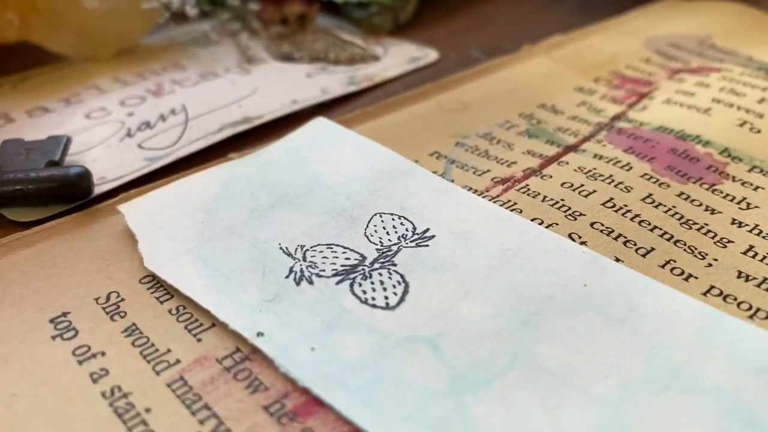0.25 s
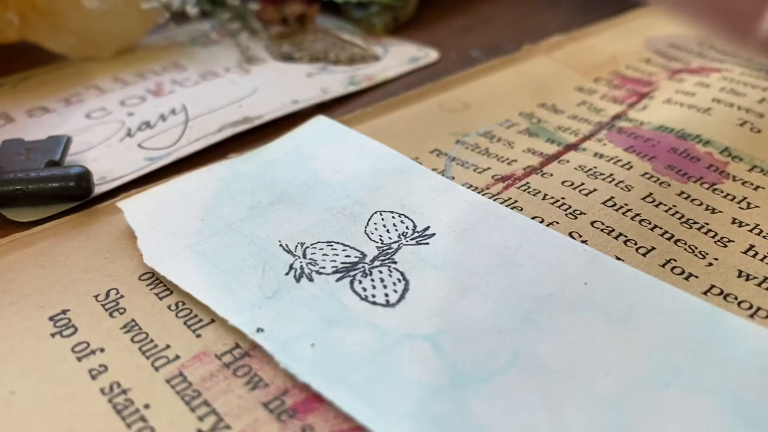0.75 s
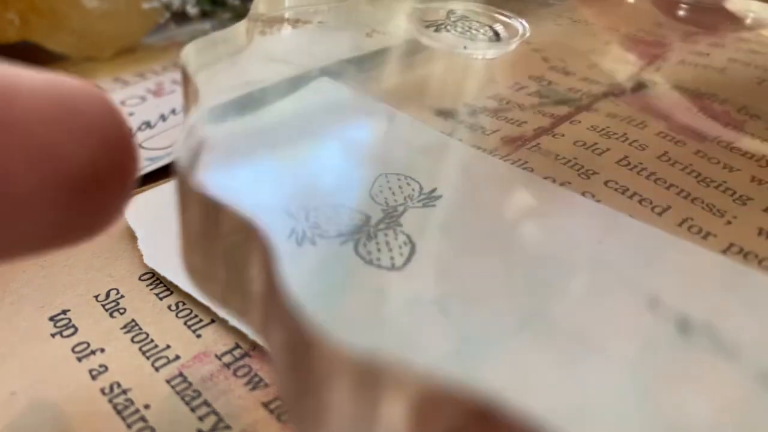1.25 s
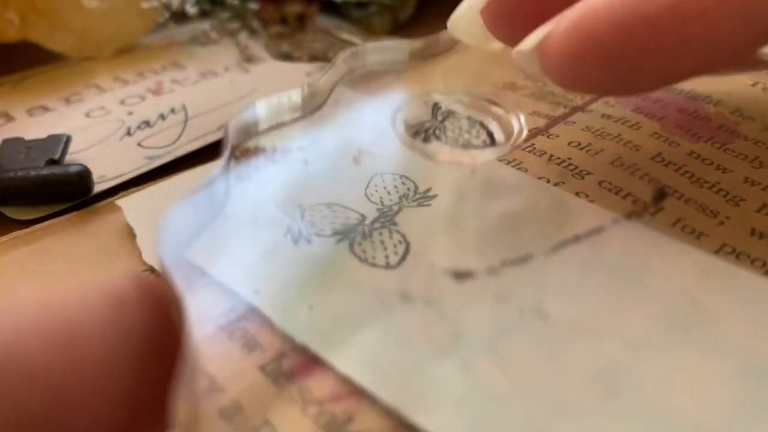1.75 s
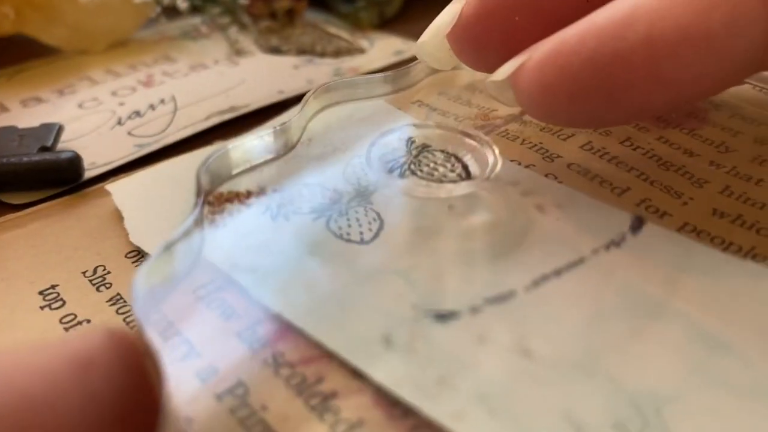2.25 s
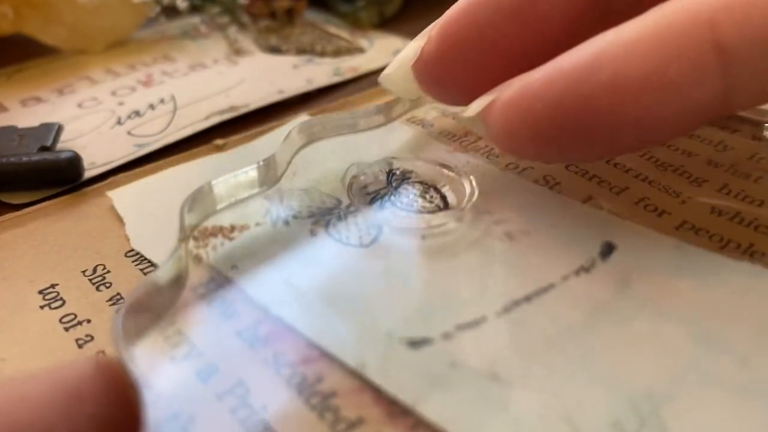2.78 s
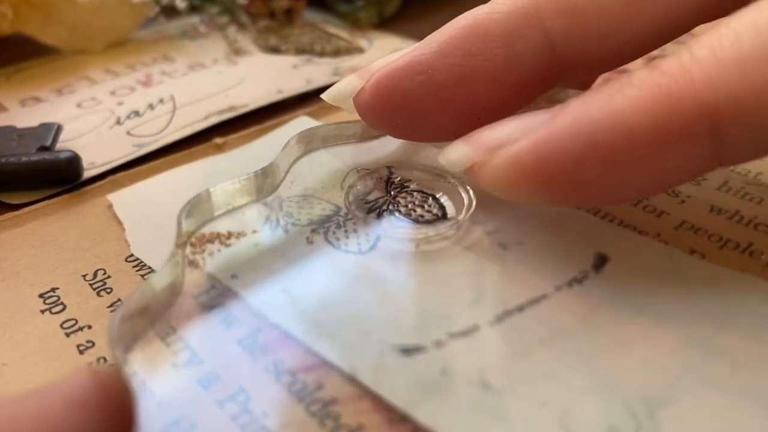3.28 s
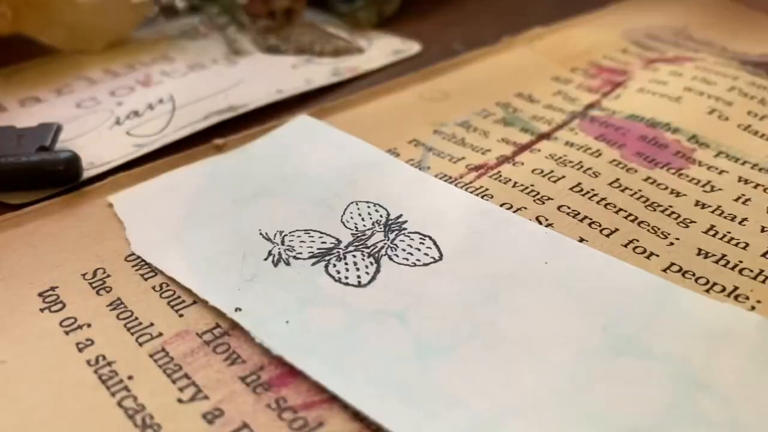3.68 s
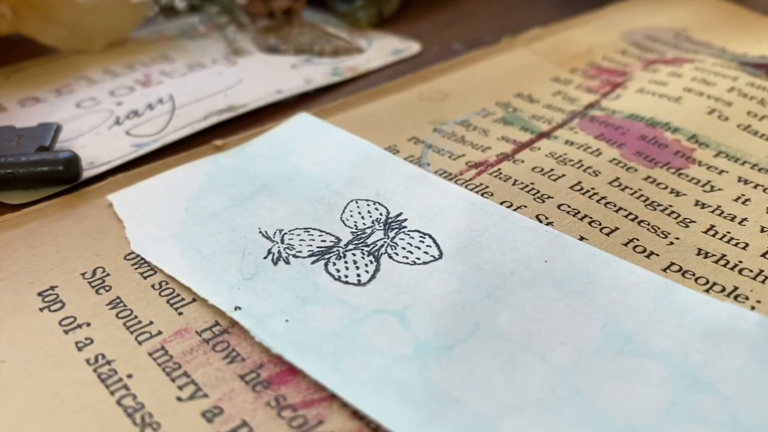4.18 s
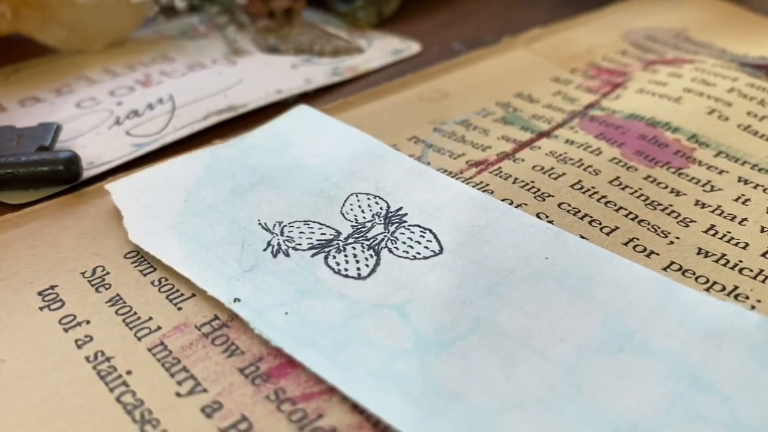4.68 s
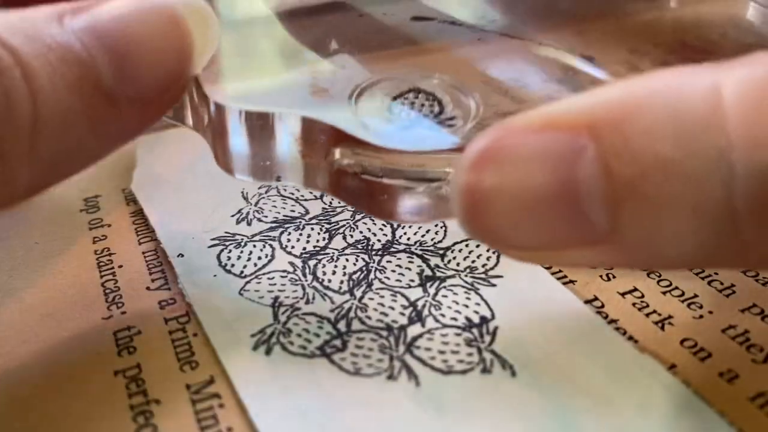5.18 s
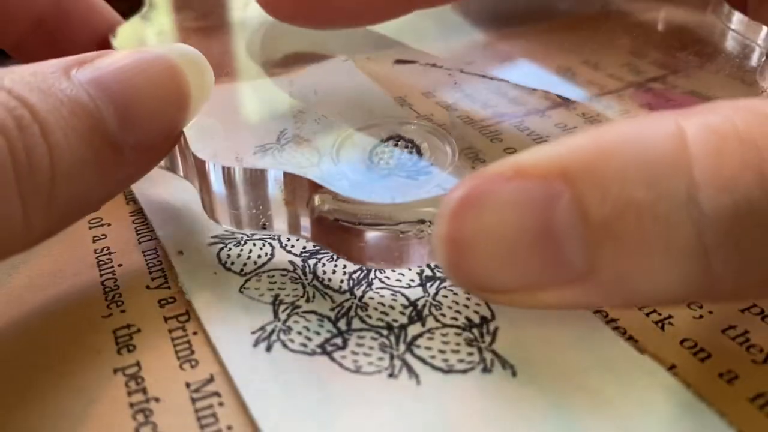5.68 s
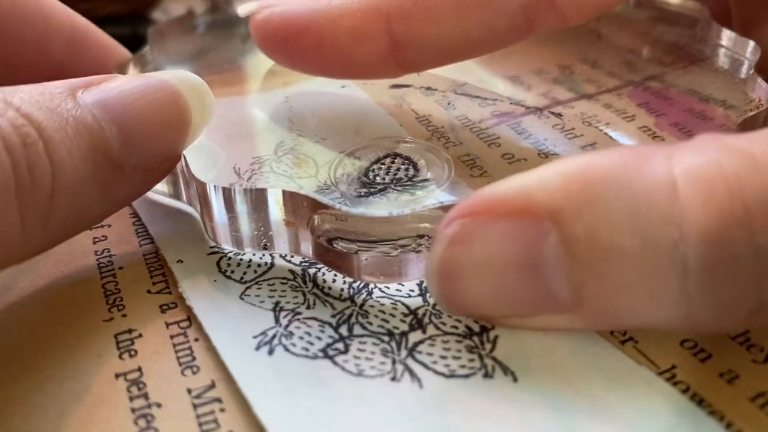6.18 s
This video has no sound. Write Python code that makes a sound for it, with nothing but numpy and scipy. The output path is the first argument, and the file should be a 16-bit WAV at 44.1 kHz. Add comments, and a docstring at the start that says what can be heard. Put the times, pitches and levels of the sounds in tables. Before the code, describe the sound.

Close clicks and knocks of a plastic stamp block on a wooden table, with fingers brushing paper, ending in a louder clatter.

```python
"""Hands work a plastic stamp block on paper on a wooden table, close to a small pair of microphones.
Over a low rumble the table thuds, the block clicks and a far bang rings through the house; at 0.4 s
the sound stops short and fades in again. Skin brushes the paper, another bang rings, and around 2 s
the block drags by stick and slip. Knocks at 3.6 s are followed by two more bangs. At 4.75 s the sound
stops and fades in once more, and near 6 s come the loudest, most reverberant blows."""
import sys
import numpy as np
from scipy import signal
from scipy.fft import rfft, irfft
from scipy.io import wavfile

SR = 44100
rng = np.random.default_rng(int(sys.argv[2]) if len(sys.argv) > 2 else 0)


def transcribe(u):
    """Save the signal u as a 16-bit wav file named by the first command-line argument.

    u: samples, shape (n,) or (channels, n), limited to [-1, 1]; the rate is SR.
    q: integer samples, one column per channel.
    """
    v = np.clip(np.atleast_2d(u).T, -1, 1)
    q = np.round(v * 32767).astype(np.int16)
    wavfile.write(sys.argv[1], SR, q)


N = 284004

# Left-right likeness of the background and reverberation, wide in the middle, narrow in bass and treble:
# (frequency [Hz], correlation [0-1])
DIFFUSE = [(60, 1), (130, 0.83), (290, 0.98), (640, 0.041), (1400, 0.18), (3100, 0.3), (5500, 0.19),
           (7000, 0.86), (16000, .99)]


def gain_of(db):
    """Amplitude ratio of a level: tenfold for every 20 dB."""
    return 10 ** (np.asarray(db) / 20)


def at_frequency(points, hz):
    """Interpolation of a table along logarithmic frequency."""
    f, value = np.transpose(points)
    return np.interp(np.log(hz + 1), np.log(f + 1), value)


def over_time(rows, column=1):
    """Linear interpolation of one column over the whole duration."""
    rows = np.array(rows)
    return np.interp(np.arange(N) / SR, rows[:, 0], rows[:, column])


def add(mix, start_s, sound):
    """Superposition: a sound sums into the mix from its start time."""
    part = mix[:, round(start_s * SR):][:, :sound.shape[1]]
    part += sound[:, :part.shape[1]]


def noise(colour, correlation, grain_db=0., grains_per_s=0., hold=0.69, size=N):
    """Partly coherent stereo noise of unit rms; random grains modulate it, decaying by `hold` a sample."""
    grain_gain = gain_of(grain_db * np.minimum(rng.exponential(1, size), 4))
    grains = grain_gain * (rng.random(size) < grains_per_s / SR)
    grit = 1 + signal.lfilter([1], [1, -hold], grains)
    left, independent = rfft(rng.standard_normal((2, size)) * grit)
    hz = np.fft.rfftfreq(size, 1 / SR)
    likeness = np.clip(at_frequency(correlation, hz), 0, 1)
    right = likeness * left + np.sqrt(1 - likeness ** 2) * independent
    pair = irfft(np.array([left, right]) * gain_of(at_frequency(colour, hz)), size)
    return pair / np.sqrt(np.mean(pair ** 2) + 1e-20)


def reverberation(source, t60, colour, size):
    """Convolution with a noise tail whose bands decay exponentially, each at its own rate."""
    hz, t, bands = signal.stft(noise(colour, DIFFUSE, size=size), SR, nperseg=256)
    decay = gain_of(-60 * t / at_frequency(t60, hz)[:, None])
    tail = signal.istft(bands * decay, SR, nperseg=256)[1]
    return signal.fftconvolve(source, tail / np.linalg.norm(tail[0]), axes=1)[:, :N]


def strike(modes, db, hz, contact_ms, octaves):
    """Modal response: a blow rings the modes near its favoured pitch; a long contact makes them swell."""
    t = np.arange(8000) / SR
    f, mode_db, t60 = np.transpose(modes)[:, :, None]
    excitation_db = -6 * (np.log2(f / hz) / octaves) ** 2
    envelopes = gain_of(mode_db + excitation_db - 60 * t / t60)
    ring = (envelopes * np.sin(2 * np.pi * (f * t + rng.random(f.shape)))).sum(0)
    ring *= 1 - np.exp(-(1000 * t / contact_ms) ** 2)
    return gain_of(db) * ring[None] / abs(ring).max()


def friction_power(start_s, length_s, db, rise, sag, fall):
    """Power of a sliding contact: it rises, sags while held and falls away, at rates in dB/s."""
    t = np.arange(N) / SR - start_s
    held_db = db + rise * np.minimum(t, 0) - sag * np.clip(t, 0, length_s)
    return gain_of(held_db - fall * np.maximum(t - length_s, 0)) ** 2


def rumble():
    """Slow amplitude modulation: noise strongest near 50 Hz swells and ebbs."""
    # Envelope of the rumble: (time [s], level [dB])
    swell = [(0, -49), (.4, -49), (.6, -39.5), (1.2, -48.5), (1.6, -41.5), (2.4, -41.5), (2.7, -45),
             (3.9, -41), (4.2, -49), (6.44, -39.5)]
    # Its spectrum: (frequency [Hz], relative level [dB])
    colour = [(20, -43.5), (40, -30.5), (50, 3), (57, -3.5), (66, -3.5), (95, -8.5), (130, -22),
              (200, -22.5), (400, -71.5)]
    return gain_of(over_time(swell)) * noise(colour, DIFFUSE)


def room_air():
    """Stationary noise: the faint hush of the room."""
    # Spectrum of the hush: (frequency [Hz], relative level [dB])
    colour = [(150, -5.5), (250, 3), (500, -2), (1000, -7.5), (1500, -15.5), (2500, -17.5), (5000, -20.5),
              (8000, -26.5), (13000, -29), (14500, -60)]
    return gain_of(-64.5) * noise(colour, DIFFUSE)


def table_thuds():
    """Damped modal vibration: the struck wooden top rings until the pressing hand stops it."""
    # Blows: (time [s], level before hand damping [dB], favoured pitch [Hz], contact time [ms])
    thuds = [(.004, -27, 392, 12), (0.058, -33, 186, 1.9), (0.449, -19.5, 400, 52),
             (0.484, -28.5, 232, 2.3), (0.511, -33.5, 450, 2.2), (0.517, -21.5, 383, 8.7),
             (1.521, -39, 430, 17), (1.64, -21.5, 433, 3.5), (1.647, -33.5, 130, 8.9),
             (2.21, -27, 223, 3.1), (2.245, -29, 237, 1.3), (2.496, -38, 584, 3.4), (2.79, -33.5, 298, 0.7),
             (3.479, -37.5, 222, 3.6), (3.5, -29, 490, 15), (3.567, -22.5, 550, 0.7),
             (3.577, -25.5, 547, 14), (3.593, -15.5, 520, 18), (3.601, -16, 473, 14),
             (4.648, -30.5, 477, 5.9), (4.653, -17, 311, 9.7), (4.698, -33.5, 256, 5.2),
             (4.729, -38.5, 514, 1.3), (5.934, -14.5, 800, 0.86), (5.938, -9, 680, 11.3),
             (5.94, -21.5, 137, 2.7), (6.001, -15, 1400, 5.4), (6.031, -9.5, 707, 30),
             (6.042, -31, 120, 5.6), (6.045, -15, 870, 3), (6.074, -25.5, 705, 2)]
    # Modes of the top: (frequency [Hz], relative level [dB], t60 [s])
    wood_modes = [(129, -10, 0.32), (157, 13, 0.031), (275, 3.5, 0.033), (351, -1, 0.032),
                  (471.4, 9, 0.026), (636, 6.5, 0.027), (852, -0.5, 0.025), (986, -7, 0.16),
                  (1190, -7, 0.24), (1382, 5, 0.093), (1884, 12, 0.022)]
    damped_cycles = 9.3  # the hand's damping reaches 1/e after this many cycles
    out, t = np.zeros((1, N)), np.arange(8000) / SR
    for s, db, hz, contact_ms in thuds:
        damping = np.exp(-(t * hz / damped_cycles) ** 2)
        add(out, s, damping * strike(wood_modes, db, hz, contact_ms, octaves=0.4))
    return out


def block_clicks():
    """Impact transients: nails and edges give a dry crack and a fainter modal ring of the plastic."""
    # Cracks: (time [s], peak level [dB], favoured pitch [Hz], t60 [ms], relative broadband floor [dB])
    clicks = [(.0044, -33, 7600, 9, 2), (0.0548, -46.5, 5040, 25, -2), (.66, -42.5, 2200, 66, -23.5),
              (0.977, -49.5, 3470, 41, 0), (1.2154, -51, 14500, 12, -12), (1.3235, -33.5, 11600, 39, -18.5),
              (1.6383, -14.5, 1440, 9.6, -43.5), (1.685, -34, 1180, 21, -49), (1.8417, -33, 1430, 17, -53),
              (2.177, -47, 3000, 33, -5), (2.725, -54, 8000, 8, -12), (2.772, -42, 7600, 5.4, -21),
              (2.853, -45, 4330, 13, -8), (3.057, -36, 1700, 60, 1), (3.438, -32, 5700, 24, -10),
              (3.4982, -28, 1290, 23, -39), (3.528, -44.5, 8000, 6, 3), (3.566, -42, 1630, 72, -35),
              (3.581, -40, 1740, 6.6, -23), (3.596, -38, 1630, 56, -37), (3.605, -46, 4600, 6.1, -13),
              (3.711, -47, 11900, 8.9, -22), (5.1789, -42, 6050, 9.1, -9), (5.881, -47.5, 10700, 16, -7),
              (5.9335, -17, 1580, 4.7, -22), (5.9337, -16.5, 3800, 13, -12), (5.971, -18, 1940, 27, -17),
              (6.001, -15, 6030, 16, -10.5), (6.0446, -9, 6850, 18, -8.5), (6.059, -20.5, 5880, 36, -14),
              (6.172, -51, 12000, 9.5, -16), (6.182, -47, 12000, 11, -28), (6.403, -39.5, 1120, 30, -44)]
    # Modes of the block: (frequency [Hz], relative level [dB], t60 [s])
    plastic_modes = [(2040, 10, 0.018), (3313, 2, 0.028), (4630, 0.5, 0.026), (6560, -1, 0.011),
                     (7370, 0, 0.0045)]
    ring_db, onset_cycles = -10, 0.83  # onset counted in cycles: low knocks start softer
    out, t = np.zeros((1, N)), np.arange(2048) / SR
    f = np.fft.rfftfreq(len(t), 1 / SR) + 1
    for s, db, hz, t60_ms, floor_db in clicks:
        band_db = np.maximum(-6 * (np.log2(f / hz) / 0.42) ** 2, floor_db)
        bass_loss_db = 6 * np.maximum(np.log2(900 / f), 0)
        crack = irfft(rfft(rng.standard_normal(len(t))) * gain_of(band_db - bass_loss_db))
        onset = 1 - np.exp(-(t * hz / onset_cycles) ** 2)
        crack *= onset * gain_of(-60000 * t / t60_ms)
        add(out, s, gain_of(db) * crack[None] / abs(crack).max())
        add(out, s, strike(plastic_modes, db + ring_db, hz, contact_ms=0.45, octaves=0.38))
    return out


def place_blows(blows):
    """Direct and reverberant sound: the blows lean to the left, and the last ones are more reverberant."""
    # Balance and room level: (time [s], left-right level difference [dB], level sent to the room [dB])
    placement = [(0, 3.5, -9.5), (1.6, 3.5, -17), (3.5, 3, -20), (4.6, 0.5, -13.5), (5.9, 8, -5),
                 (6.44, 8, -10)]
    # Decay of the near room: (frequency [Hz], t60 [s])
    room_t60 = [(200, 0.13), (600, 0.22), (2000, 0.24), (6000, 0.12)]
    # Spectrum of its reflections: (frequency [Hz], relative level [dB])
    room_colour = [(400, -2.5), (2500, -2)]
    body = signal.filtfilt(*signal.butter(4, 7500, fs=SR), blows)
    treble = blows - body  # equally loud on both sides
    direct = treble + body * gain_of(over_time(placement) * np.array([[.5], [-.5]]))
    radiated = blows * gain_of(over_time(placement, column=2))
    return direct + reverberation(radiated, room_t60, room_colour, size=14000)


def skin_brush():
    """Friction noise: skin on paper makes a fine gritty hiss; firmer contact adds the lower bands."""
    # Strokes: (time of full contact [s], length [s], level [dB], firmness [0-1])
    strokes = [(0.024, 0.046, -70, 1), (0.702, .11, -51, 0.14), (0.827, 0.14, -62.5, .75),
               (0.927, 0.1, -54.5, 0.02), (1.042, .06, -56, 0.04), (1.095, 0.099, -50.5, 0.2),
               (1.316, .06, -62, 0.3), (1.515, 0.069, -55, 0.6), (1.622, 0.023, -60.5, 0.7),
               (1.749, 0.053, -52.5, 1), (1.872, .14, -64, 0.4), (2.06, 0.065, -56, .4),
               (2.19, .05, -76, 0.4), (2.755, 0.12, -61, 0.1), (2.936, 0.19, -58.5, 1),
               (3.044, 0.021, -50, 1), (3.09, 0.085, -68.5, 1), (3.416, 0.024, -51.5, 0.7),
               (3.467, .12, -59.5, 1), (4.765, 0.047, -53, 0.02), (5.061, 0.1, -42.5, 0.02),
               (5.228, 0.023, -54.5, 0), (5.78, 0.024, -55, 0), (5.83, 0.25, -63.5, 0.3),
               (6.08, 0.11, -55, 0.8), (6.316, .04, -60, .5), (6.361, 0.03, -36, 0.15),
               (6.41, 0.024, -60, 1)]
    # Spectrum of a light touch: (frequency [Hz], relative level [dB])
    light_colour = [(800, -28), (2000, -21.5), (4000, -12), (7000, -3.5), (9000, -1), (11000, -2.5),
                    (13000, -11.5), (15500, 0)]
    # Spectrum of a firm touch: (frequency [Hz], relative level [dB])
    firm_colour = [(800, 3), (1400, 4.5), (2000, 5.5), (2800, -6), (4000, -6.5), (7000, 1.5), (9000, 5),
                   (11000, -2), (13000, 6), (15500, -7)]
    correlation = [(1000, .5), (5000, .7), (7000, .995)]  # (frequency [Hz], correlation [0-1])
    bright = noise(light_colour, correlation, grain_db=6, grains_per_s=220)
    dull = noise(firm_colour, correlation, grain_db=6, grains_per_s=220)
    light_power, firm_power = np.zeros((2, N))
    for s, length, db, firmness in strokes:
        power = friction_power(s, length, db, rise=889, sag=74.5, fall=892.5)
        light_power += (1 - firmness) * power
        firm_power += firmness * power
    return np.sqrt(light_power) * bright + np.sqrt(firm_power) * dull


def far_bangs():
    """Beyond the critical distance: short bursts are heard mostly as the reverberation of the house."""
    # Bangs: (time [s], level [dB], treble loss [dB/octave])
    bangs = [(0.174, -28.5, 1), (1.096, -28.5, 2.5), (3.676, -34.5, 4.5), (3.742, -28.5, 1)]
    # Spectrum before that loss: (frequency [Hz], relative level [dB])
    bang_colour = [(150, -12), (370, -5.5), (700, -9.5), (1000, 1.5), (1500, -11.5), (2200, -6),
                   (4000, -13), (8000, -25.5), (15500, -38)]
    # Decay of the house: (frequency [Hz], t60 [s])
    house_t60 = [(200, 0.23), (500, 0.34), (1000, 0.27), (2000, 0.23), (4000, 0.25), (8000, 0.2)]
    burst_t60_s, direct_db = 0.23, -12
    bursts = np.zeros((1, N))
    decay = gain_of(-60 * np.arange(2500) / SR / burst_t60_s)
    for s, db, loss in bangs:
        tilted = [(hz, level_db - loss * np.log2(hz / 1000)) for hz, level_db in bang_colour]
        add(bursts, s, gain_of(db) * decay * noise(tilted, DIFFUSE, size=len(decay))[:1])
    ring = reverberation(bursts, house_t60, colour=[(100, 0.015), (9000, 0)], size=24000)
    return ring + gain_of(direct_db) * bursts


def block_drag():
    """Stick-slip friction: the shoved block shakes the table in small lumps."""
    # Shoves: (time of full contact [s], length [s], level [dB])
    shoves = [(0.676, 0.071, -56.5), (1.52, 0.14, -51), (1.696, 0.09, -35.5), (1.78, 0.029, -28.5),
              (1.843, 0.027, -41), (1.895, 0.017, -35), (1.974, 0.041, -36.5), (2.063, 0.064, -29.5),
              (2.164, 0.16, -47), (5.873, 0.021, -50), (5.954, 0.02, -27.5), (6.026, 0.043, -31.5)]
    # Spectrum of the shaken table: (frequency [Hz], relative level [dB])
    colour = [(50, -48), (90, 0.5), (150, 2), (280, -6.5), (550, -5), (800, -11), (1000, -19), (1500, -26),
              (2000, -26), (2900, -47), (6000, -50)]
    correlation = [(100, .97), (1000, .7), (4000, .6)]  # (frequency [Hz], correlation [0-1])
    power = sum(friction_power(*shove, rise=598.5, sag=52.5, fall=347) for shove in shoves)
    return np.sqrt(power) * noise(colour, correlation, grain_db=2, grains_per_s=200, hold=.99)


def scene():
    """Superposition of the background, the near blows, the friction and the far bangs."""
    blows = place_blows(table_thuds() + block_clicks())
    return rumble() + room_air() + blows + skin_brush() + far_bangs() + block_drag()


def record(dry):
    """A stepped left-right phase shift widens the stereo sound; two brief breaks and a band limit follow."""
    # Phase of the left channel relative to the right: (frequency [Hz], phase [rad])
    stereo_phase = [(600, -1.3), (1300, -1.7), (2300, 0), (7500, -.1), (8350, -2.8), (9560, -3.3),
                    (10400, -5.8), (11700, -6.4), (12500, -8.9), (13700, -9.5), (14300, -12),
                    (16400, -12.7)]
    # The sound stops short and returns: (time [s], fade-in time [s])
    breaks = [(0.422, 0.1), (4.753, 0.12)]
    stop_s, edge_hz = 0.0023, 16000
    hz, radians = np.transpose([(0, 0)] + stereo_phase)
    shift = np.exp(-1j * np.interp(np.fft.rfftfreq(N, 1 / SR), hz, radians))
    out = np.array([dry[0], irfft(rfft(dry[1]) * shift, N)])
    t = np.arange(N) / SR
    for s, fade_s in breaks:
        out *= np.clip(np.where(t < s, (s - t) / stop_s, (t - s) / fade_s), 0, 1)
    lowpass = signal.firwin(511, edge_hz, window=("kaiser", 9), fs=SR)
    return signal.oaconvolve(out, lowpass[None], "same")


dry = scene()
out = record(dry)
transcribe(out)
```